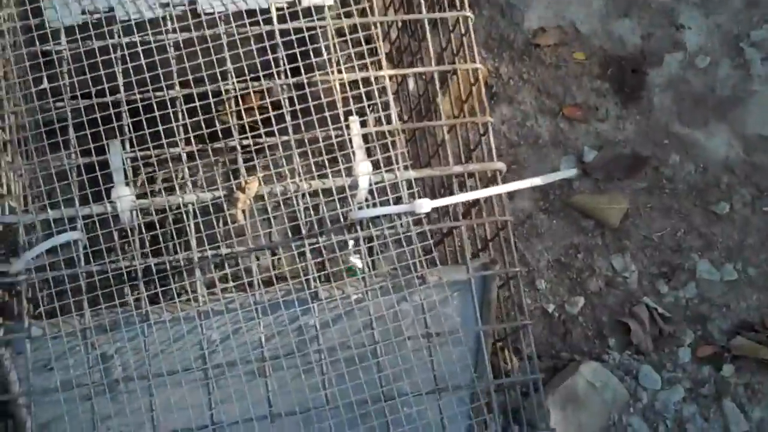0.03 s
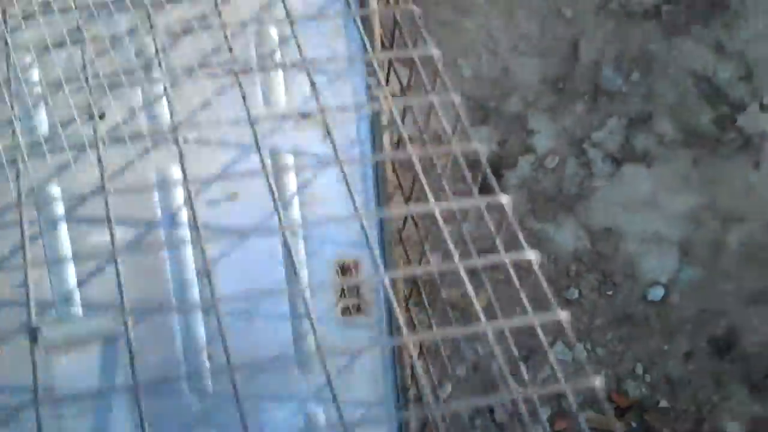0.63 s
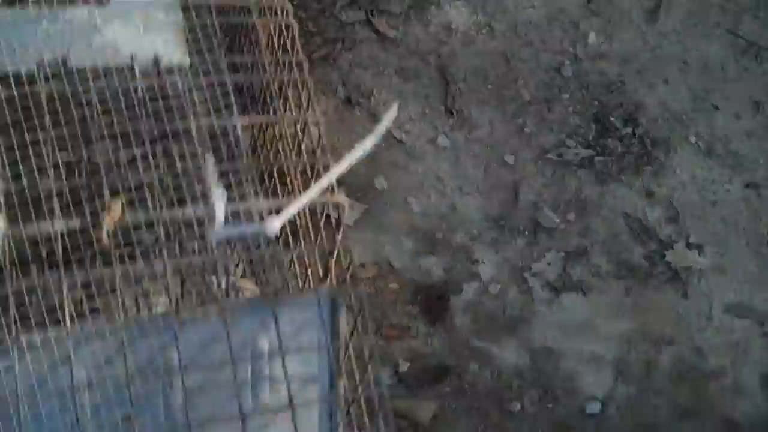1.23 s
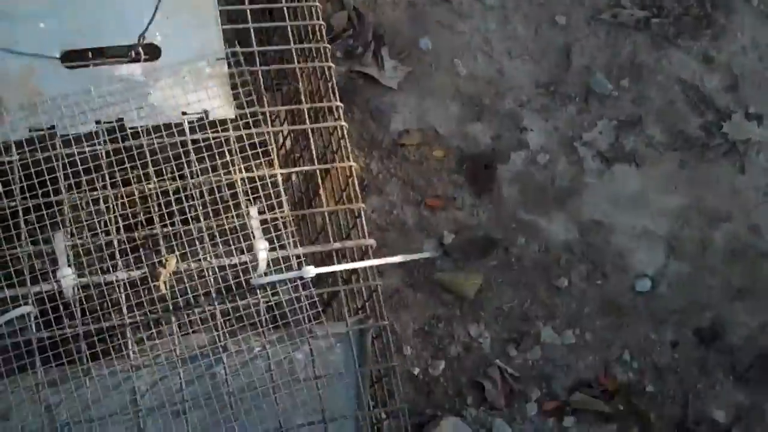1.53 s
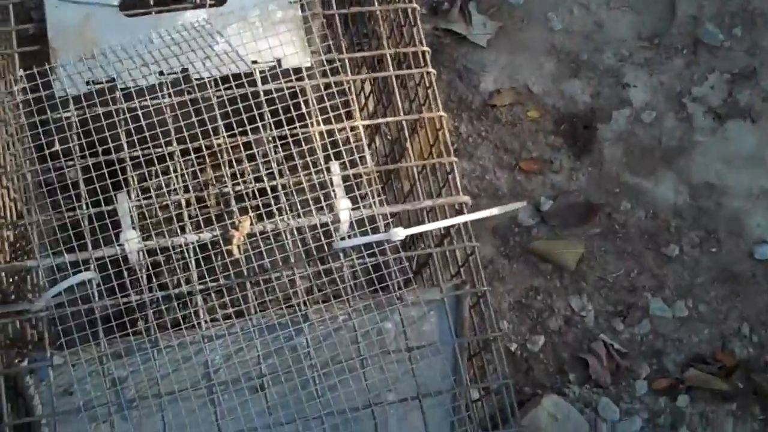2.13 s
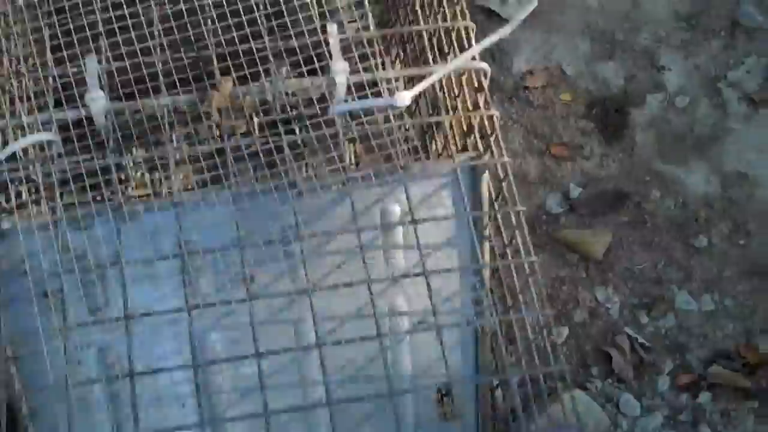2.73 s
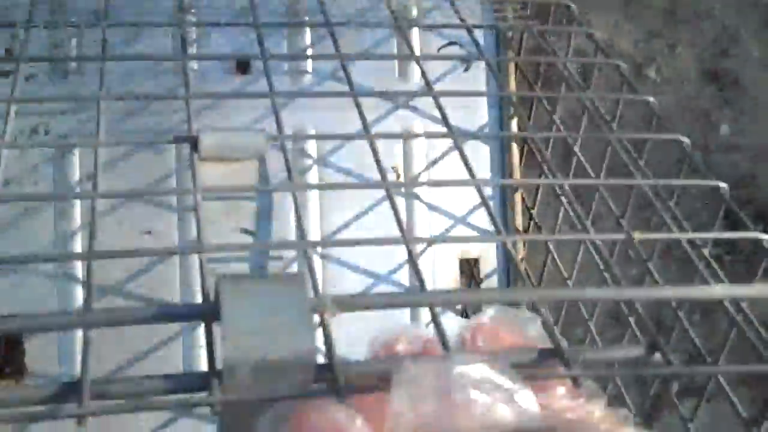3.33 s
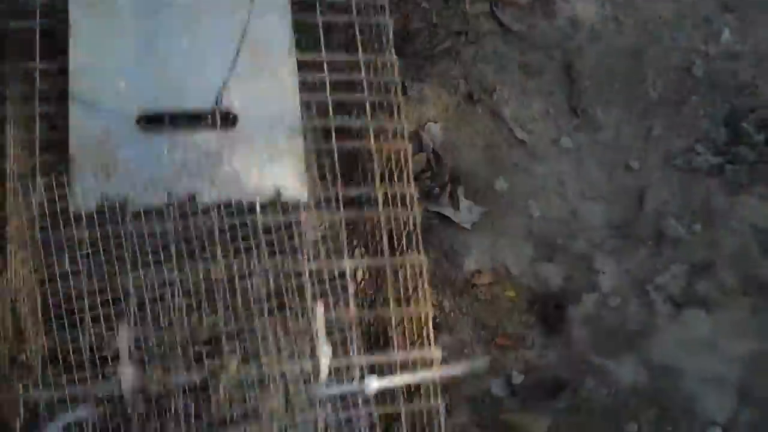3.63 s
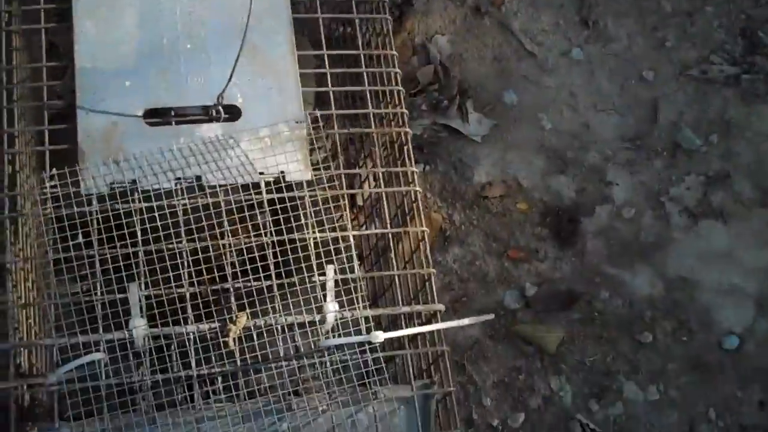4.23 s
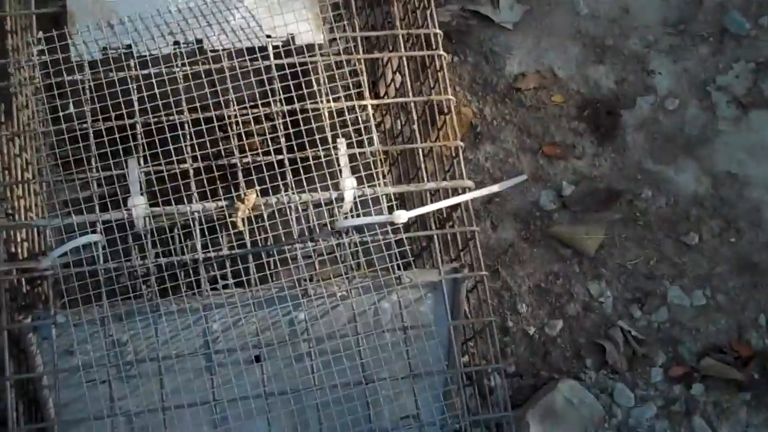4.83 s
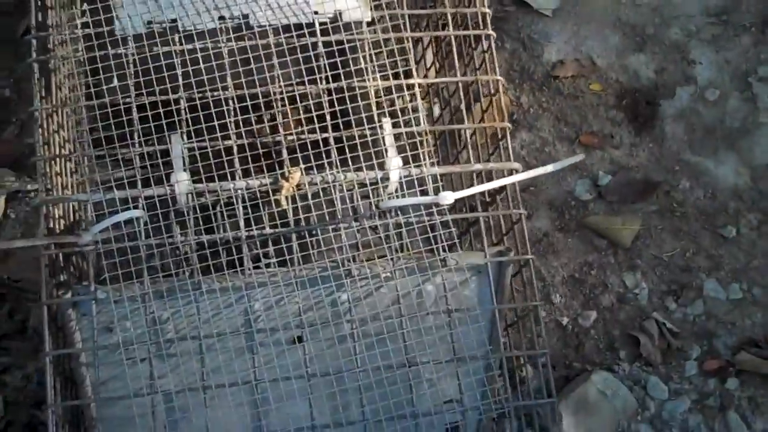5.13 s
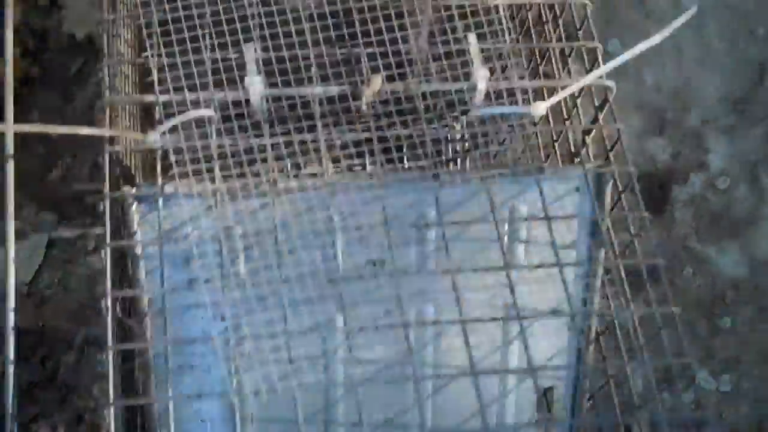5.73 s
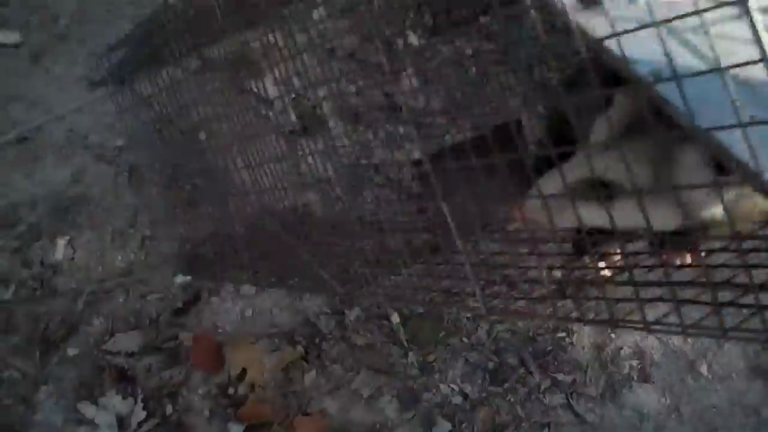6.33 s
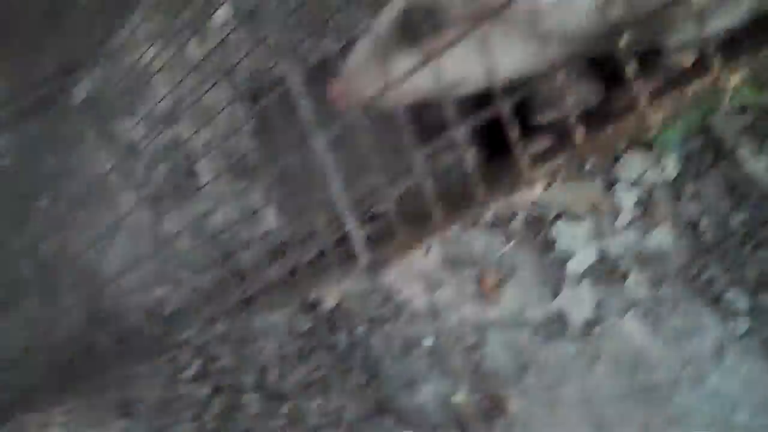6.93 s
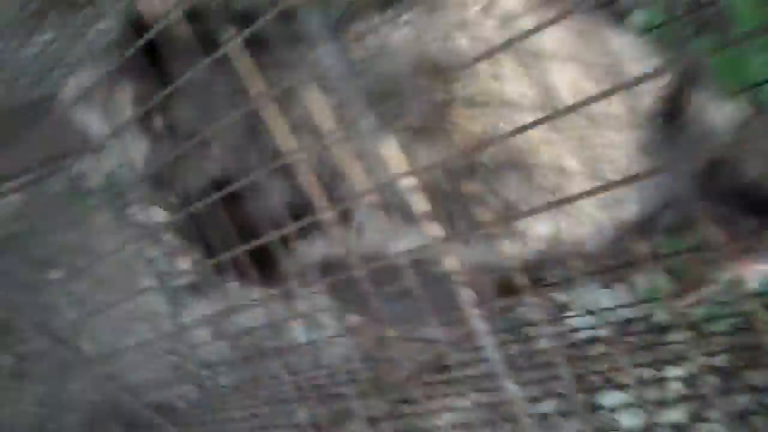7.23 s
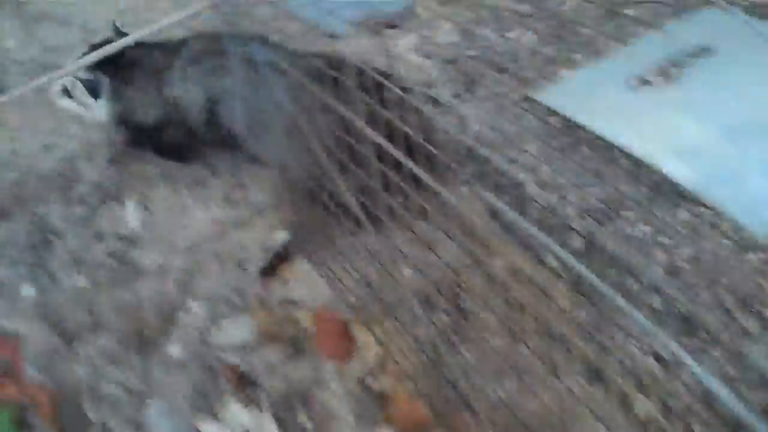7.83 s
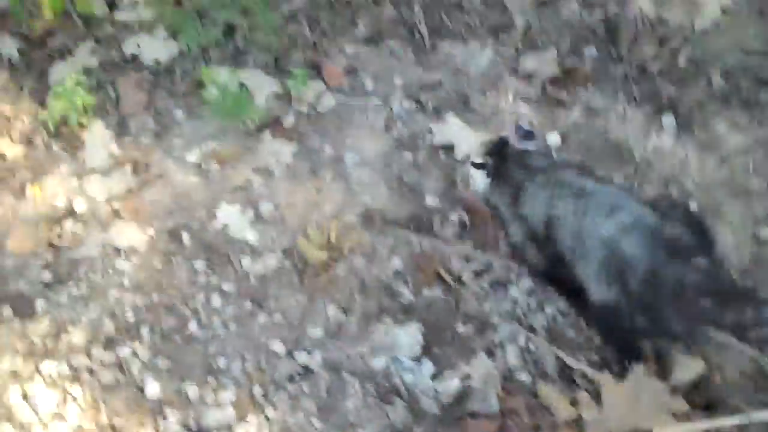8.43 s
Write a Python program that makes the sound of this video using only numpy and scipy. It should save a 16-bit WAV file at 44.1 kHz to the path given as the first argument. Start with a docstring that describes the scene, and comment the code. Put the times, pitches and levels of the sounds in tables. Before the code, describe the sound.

A wire trap's metal door slams twice with a ringing rattle amid leaf rustling, then an opossum scurries out over dry leaves.

```python
"""Sleeves and dry leaves rustle close by, twigs snap, and a far machine throbs faintly.
The sheet-metal door of a wire live trap slams twice: it rebounds, the mesh rattles and rings,
and the cage thumps the soil. Then the animal inside scurries out over the leaves.
Only the right microphone works; the slams overload it and push its gain down."""
import sys
import numpy as np
from scipy import signal
from scipy.fft import rfft, irfft
from scipy.io import wavfile

SR = 44100
rng = np.random.default_rng(int(sys.argv[2]) if len(sys.argv) > 2 else 0)


def generate_wav(sig):
    """Save sig (samples, or channels by samples) to the path in sys.argv[1] as 16-bit PCM at SR."""
    pcm = np.round(np.clip(np.atleast_2d(sig).T, -1, 1) * 32767).astype(np.int16)
    wavfile.write(sys.argv[1], SR, pcm)


N = 373968
TIME = np.arange(N) / SR

# Four spells of handling, a fader curve each. Each row: time in seconds, level in dB.
HANDLING = [
    [(0.0, -41), (0.058, -34), (0.082, -43.5), (0.134, -36.5), (1.028, -38), (1.218, -27), (1.23, -35.5),
     (1.336, -41), (1.344, -50.5), (1.42, -44)],
    [(1.98, -58.5), (2.184, -53.5), (2.362, -42), (3.322, -39), (3.352, -48.5), (3.514, -32.5),
     (3.524, -35.5), (3.562, -27.5), (3.73, -47.5), (3.74, -37.5)],
    [(4.45, -53), (4.542, -61), (4.564, -44.5), (4.578, -55), (4.858, -49.5), (4.922, -39), (5.18, -37.5),
     (5.272, -46.5), (5.326, -38.5), (5.41, -44.5)],
    [(5.46, -33.5), (5.508, -43.5), (6.14, -29), (6.158, -38.5), (6.524, -41), (6.568, -34.5),
     (6.796, -41.5), (6.854, -37.5), (7.006, -38.5), (7.06, -36.5)],
]
# The animal's run through the leaves. Each row: time in seconds, level in dB.
ESCAPE = [(7.06, -41), (7.28, -24), (7.412, -29), (7.918, -34), (8.294, -33), (8.48, -35.5)]
# Single sweeps through the leaves. Each row: peak time in seconds, level in dB, swell in seconds.
SWISHES = [(.18, -43, 0.034), (.47, -37, 0.051), (.7, -34.5, 0.013), (2.57, -39.5, 0.038),
           (3.79, -32, 0.022), (5.63, -33, 0.015), (6.69, -37, 0.028), (7.09, -30, 0.021),
           (7.29, -33, 0.042), (7.432, -27, 0.033), (7.55, -30, 0.15), (7.84, -34.5, 0.069),
           (8.16, -27.5, .04)]
# EQ of the dry leaves. Each row: frequency in Hz, relative level in dB.
RUSTLE_EQ = [(150, -66), (250, -22), (488, -26.5), (540, -20.5), (774, -18), (2200, -9.5), (2570, -10.5),
             (3620, -9), (4760, -7), (5850, 1), (6480, -2.5), (7820, -13), (13100, -28), (14200, -35),
             (15000, -87)]
# Weight of the crunch in dB, for each spell of handling and then for the run.
CRUNCH_DB = [-7.5, -8.5, -12.5, -7.5, -2.5]
# The far machine. Each row: time in seconds, throb level in dB, whine level in dB.
MACHINE = [(0, -78, -73.5), (1.1, -68.5, -56.5), (2.2, -68, -66.5), (3.0, -80, -72), (4.7, -74, -74),
           (6.0, -69, -63.5), (6.7, -60.5, -58.5), (8.48, -71, -63)]
# EQ of the outdoor air. Each row: frequency in Hz, relative level in dB.
AIR_EQ = [(15, -28), (25, -8.5), (202, 2), (344, -19), (584, 0), (761, -1), (916, 2), (2640, -15.5),
          (6000, 2), (8240, -56), (14000, -34)]
# The loudest twigs and leaves breaking, and at 6.464 s a bright tick of a cage wire. Each row: start in
# seconds, level in dB, 60 dB decay in seconds.
SNAPS = [(.051, -32, 0.067), (.243, -22.5, 0.024), (.259, -24, 0.057), (0.854, -23, 0.04),
         (.933, -35, 0.013), (0.958, -27, 0.01), (1.212, -14.5, 0.034), (2.671, -25, .009),
         (3.108, -23, 0.0058), (3.416, -23.5, 0.034), (3.446, -33, 0.023), (3.506, -13.5, 0.032),
         (5.129, -32, .03), (5.235, -38, .04), (5.43, -18, .09), (5.777, -23, 0.16), (6.132, -24, 0.015),
         (6.464, -16, 0.013), (6.502, -30, 0.035), (6.557, -19.5, 0.077), (6.605, -20, .07),
         (6.822, -29, .015), (6.844, -24.5, 0.048), (7.07, -23.5, 0.36), (7.296, -16, 0.1),
         (7.613, -16.5, 0.054), (8.162, -12, 0.037)]
# EQ of a snap. Each row: frequency in Hz, relative level in dB.
SNAP_EQ = [(290, -59), (500, -23), (1680, -17), (3830, -11.5), (5310, -2), (6210, 0), (8250, -15),
           (13400, -31), (14400, -49), (15000, -43)]
# Paws and shoes. Each row: start in seconds, level in dB, decay in seconds, centre pitch in Hz.
STEPS = [(.605, -24.5, 0.02, 2340), (.989, -31.5, 0.019, 1700), (6.226, -28.5, 0.1, 1490),
         (6.227, -24.5, 0.073, 3280), (6.69, -33, 0.033, 600), (7.255, -28, 0.094, 1120),
         (7.272, -24.5, 0.041, 368), (7.735, -45, 0.62, 304), (7.984, -37.5, 0.19, 380),
         (8.135, -37, 0.31, 415), (8.16, -30, 0.086, 705), (8.22, -32, .16, 775), (8.255, -29.5, 0.14, 750)]
# EQ of soil under the paws. Each row: frequency in Hz, relative level in dB.
SCUFFLE_EQ = [(60, -3.5), (150, -1), (300, 3), (500, 4), (900, 5), (2000, -63)]
# Door slams. Each row: start in seconds, level in dB, rebound gap in seconds,
# shake length in seconds, trim of the frame's rattle in dB.
SLAMS = [(1.446, -1, 0.0613, 0.25, -22), (3.805, -1, 0.079, 0.43, -10)]
# Lighter blows on the cage. Each row: start in seconds, level in dB, chatter decay in seconds.
BLOWS = [(1.829, -32.5, 0.32), (3.765, -30, 0.26), (4.09, -25, 0.34), (4.318, -23, 0.061),
         (4.353, -25, 0.16), (4.405, -36, 0.21), (7.729, -15.5, 0.34)]
# EQ of the struck cage. Each row: frequency in Hz, relative level in dB.
CAGE_EQ = [(88, -30), (150, -13.5), (409, -14.5), (661, -10), (772, -13.5), (1090, -9), (1570, -7.5),
           (2400, -8), (2920, -10.5), (4210, -6.5), (6300, 0.5), (8920, -18.5), (13400, -29.5),
           (14200, -70), (15000, -105)]
# Narrow ringing tones that colour the slams. Each row: pitch in Hz, relative level in dB,
# decay in seconds.
SLAM_TONES = [(356.6, 12.5, 0.3), (587, 6, 0.72), (627, 13, 0.4), (930, 2.5, 1), (1424, 1, 0.95),
              (1490, 3, 0.5), (1760, 6.5, 0.84), (2210, 5, 0.77), (2480, 1, 0.65), (2540, 9, 0.25),
              (2567, 15, 0.23), (2764, 13, 0.35), (3165, 12, 0.53), (3469, 2, 0.39), (3700, -12, 0.74),
              (4297, -27, 0.18), (4538, -3, 0.37)]
# The cage's weight landing on the soil. Each row: start in seconds, level in dB.
THUMPS = [(1.46, -13.5), (1.507, -21.5), (3.819, -9.5)]
# EQ of that thud. Each row: frequency in Hz, relative level in dB.
THUMP_EQ = [(20, -5), (40, 1), (65, -1.5), (100, -2), (150, -4), (200, -1), (280, -4.5), (380, -13.5),
            (580, -8), (1000, -22)]
# Boom of the sheet-metal floor. Each row: pitch in Hz, relative level in dB, decay in seconds.
FLOOR_MODES = [(89, -4, .1), (258, 3, 0.12)]
# Single wires twanging. Each row: start in seconds, level in dB, decay in seconds, pitch in Hz.
TWANGS = [(1.74, -43, .5, 2510), (2.22, -58, 0.28, 1270), (3.13, -49.5, 0.28, 960), (4.09, -42, 0.47, 3165),
          (4.357, -55, .3, 1460), (4.44, -62, .9, 930)]
# A finger on the microphone housing. Each row: start in seconds, level in dB, decay in seconds,
# centre pitch in Hz.
BUMP = [(8.052, -34, 0.039, 75)]
# EQ of the preamp hiss. Each row: frequency in Hz, relative level in dB.
HISS_EQ = [(20, 8.5), (60, 0), (300, 3.5), (1000, 0.5), (3000, -4.5), (7000, -9.5), (14000, -14)]


def from_db(db):
    """Decibels to gain."""
    return 10 ** (np.asarray(db) / 20)


def rms_one(x):
    """Scale to unit rms."""
    return x / np.sqrt(np.mean(x ** 2) + 1e-20)


def noise():
    """White noise."""
    return rng.standard_normal(N)


def drift(per_s):
    """Random wander of spread 1."""
    knots = rng.standard_normal(N // 20)
    return np.interp(TIME * per_s, np.arange(len(knots)), knots) * np.sqrt(3 / 2)


def butter(x, hz, kind, order=2):
    """Butterworth filter."""
    return signal.sosfilt(signal.butter(order, np.clip(hz, 10, .45 * SR), kind, fs=SR, output="sos"), x)


def convolve(x, response):
    """Pass a sound through a response of unit energy."""
    return signal.oaconvolve(x, response / np.linalg.norm(response))[:N]


def eq(x, spectrum, size=4096):
    """Minimum-phase EQ: shapes the tone with no ringing ahead of an attack."""
    hz, db = np.transpose(spectrum)
    grid = np.maximum(np.arange(size // 2 + 1) * SR / size, 1)
    gains = from_db(np.interp(np.log(grid), np.log(hz), db))
    cepstrum = irfft(np.log(gains))
    return convolve(x, irfft(np.exp(rfft(2 * cepstrum[:size // 2], size))))


def grains(per_s, spread_db):
    """Random tiny contacts of uneven size, rms 1."""
    sizes = from_db(spread_db * np.minimum(rng.exponential(1, N), 5))
    return rms_one((rng.random(N) < per_s / SR) * sizes * rng.choice([-1, 1], N))


def bursts(rows, rise_s):
    """Envelope of hits that swell quickly and die away; their powers add."""
    power = np.zeros(N)
    for s, db, t60 in rows:
        age = TIME[:int(t60 * SR)]
        at = int(s * SR)
        shape = from_db(db - 60 * age / t60) * (1 - np.exp(-age / rise_s))
        power[at:at + len(age)] += shape[:N - at] ** 2
    return np.sqrt(power)


def knocks(rows, width, rise_s):
    """Noise bursts, each in its own band; width is a share of the centre pitch."""
    out = np.zeros(N)
    for s, db, t60, hz in rows:
        body = rms_one(butter(noise(), [hz / (1 + width), hz * (1 + width)], "band"))
        out += bursts([(s, db, t60)], rise_s) * body
    return out


def ringing(tones):
    """One second of ring: a sum of decaying sines."""
    age = TIME[:SR]
    return sum(from_db(db - 60 * age / t60) * np.sin(2 * np.pi * (hz * age + rng.random()))
               for hz, db, t60 in tones)


def spell(rows, fade_db_per_s=400):
    """Fader for a spell of movement, closing quickly at either end."""
    times, db = np.transpose(rows)
    outside_s = np.abs(TIME - np.clip(TIME, times[0], times[-1]))
    return from_db(np.interp(TIME, times, db) - np.minimum(fade_db_per_s * outside_s, 100))


def movement(release_s=0.038):
    """Effort that drives the leaves: handling, the animal's run and single sweeps add in power."""
    power = sum(spell(rows) ** 2 for rows in HANDLING) + (from_db(-0.97) * spell(ESCAPE)) ** 2
    for s, db, swell_s in SWISHES:
        from_peak = np.maximum((s - TIME) / swell_s, (TIME - s) / release_s)
        power += from_db(db) ** 2 * np.exp(-np.minimum(from_peak ** 2, 50))
    return np.sqrt(power)


def leaf_ticks(per_s, q, count=24):
    """Every dry leaf ticks at a pitch of its own."""
    pitches = np.geomspace(1500, 9000, count) * np.exp(0.041 * rng.standard_normal(count))
    ticks = 0
    for hz in pitches:
        b, a = signal.iirpeak(hz, q, fs=SR)
        ticks += signal.lfilter(b, a, grains(per_s, spread_db=3) + 1e-18)
    return rms_one(ticks)


def crunch_gain(effort, pivot_db=-36, follows=0.74):
    """The crunch takes a share of the effort's swing and weighs most once the animal runs."""
    starts = [rows[0][0] for rows in list(HANDLING[1:]) + [ESCAPE]]
    weight_db = np.array(CRUNCH_DB)[np.searchsorted(starts, TIME)]
    return from_db(pivot_db + weight_db) * (effort / from_db(pivot_db)) ** follows


def rustle(effort, bands=10):
    """Leaves crackle and tick over soft friction: a crisp top and a coarse crunch below."""
    crackle = grains(per_s=2800, spread_db=4) + from_db(-1.5) * noise()
    clumps = from_db(1.28 * drift(35) + 1.16 * drift(260))
    contacts = clumps * (crackle + from_db(-6.5) * leaf_ticks(per_s=50, q=70))
    spectrum = rfft(eq(contacts, RUSTLE_EQ))
    # pieces of different size come and go, so each band swells on its own
    hz = np.arange(N // 2 + 1) * SR / N
    band_of = np.searchsorted(np.geomspace(900, 9000, bands - 1), hz)
    leaves = sum(irfft(spectrum * (band_of == k), N) * from_db(1.37 * drift(40)) for k in range(bands))
    crisp = rms_one(butter(leaves, 1895, "high", order=3))
    crunch = rms_one(butter(leaves, 2324, "low", order=3))
    return from_db(1.11) * effort * crisp + from_db(-4) * crunch_gain(effort) * crunch


def machine(hum_hz=198, beats_per_s=15, whine_hz=(546, 600)):
    """Two close hums beat against each other under a pair of wavering whines."""
    times, *levels = np.transpose(MACHINE)
    throb_gain, whine_gain = (from_db(np.interp(TIME, times, db)) for db in levels)
    phase = 2 * np.pi * np.cumsum(hum_hz + 3 * drift(18)) / SR
    beat = 2 * np.pi * np.cumsum(beats_per_s + 0.31 * drift(3.7)) / SR
    throb = (np.sin(phase) + 0.95 * np.sin(phase + beat)) * from_db(1.25 * drift(16))
    whines = sum(butter(noise(), [hz - 11, hz + 11], "band", order=1) for hz in whine_hz)
    return throb_gain * throb + whine_gain * rms_one(whines)


def air():
    """A faint, steady bed of outdoor noise."""
    return from_db(-57.5) * eq(noise(), AIR_EQ)


def snaps(effort, small_per_s=18):
    """Twigs and leaves break in runs of tiny fractures; the big ones open with a sharp crack."""
    moments = rng.uniform(0, N - 1, int(small_per_s * N / SR)).astype(int)
    small = effort * bursts([(at / SR, 0.5, 0.015) for at in moments], rise_s=0.0005)
    fractures = (bursts(SNAPS, rise_s=0.0039) + small) * grains(per_s=13000, spread_db=2)
    for s, db, t60 in SNAPS:
        crack_db = 17 - np.log2(t60 / 0.0078)  # quick snaps crack hardest, slow crushes least
        fractures[int(s * SR)] += from_db(db + crack_db)
    return eq(fractures, SNAP_EQ)


def steps():
    """Paws and shoes land with damped knocks; a low scuffle of soil joins as the animal bolts."""
    running = spell([(ESCAPE[0][0], -54.5), (ESCAPE[-1][0], -54)])
    scuffle = running * eq(grains(per_s=1000, spread_db=4.5), SCUFFLE_EQ)
    return scuffle + knocks(STEPS, width=0.78, rise_s=0.0019)


def door_hits(rebound_loss_db=14.5):
    """The door scrapes its guides, lands, jangles and rebounds twice; rows read like BLOWS."""
    hits = []
    for s, db, gap_s, _, _ in SLAMS:
        scrape = (s - 0.0065, db - 23, 0.084)
        landing = (s, db, 0.1)
        jangle = (s, db - 11.5, 0.44)
        rebounds = [(s + k * gap_s, db - k * rebound_loss_db, 0.16) for k in (1, 2)]
        hits += [scrape, landing, jangle] + rebounds
    return hits


def cage_shake(attack_s=0.045, sag_db_per_s=12.5, stop_db_per_s=124):
    """After a slam the cage shakes on, then comes to rest: envelopes for mesh and frame."""
    mesh, frame = 0, 0
    for s, _, _, shake_s, frame_db in SLAMS:
        age = np.maximum(TIME - s, 0)
        loss_db = sag_db_per_s * age + stop_db_per_s * np.maximum(age - shake_s, 0)
        shake = np.minimum(age / attack_s, 1) * from_db(-23 - loss_db)
        mesh += shake
        frame += from_db(frame_db) * shake
    return mesh, frame


def cage(wire_decay_s=0.15, rattle_hz=(280, 3400)):
    """Each blow makes the wires chatter and the mesh ring; narrow ringing tones add colour."""
    force = bursts(door_hits() + list(BLOWS), rise_s=0.001)
    chatter = force * grains(per_s=7000, spread_db=-0.5)
    mesh_gain, frame_gain = cage_shake()
    shaking = mesh_gain * grains(per_s=5200, spread_db=0.5) * from_db(2 * drift(70))
    contacts = chatter + shaking
    wires = ringing([(hz, 0, wire_decay_s) for hz in rng.uniform(700, 8000, size=400)])
    tones = ringing(SLAM_TONES)
    ring = from_db(-14) * convolve(contacts, wires) + from_db(-18) * convolve(contacts, tones)
    # the frame rattles dully against the mesh
    clatter = convolve(grains(per_s=350, spread_db=0.5), wires)
    clatter += from_db(-19) * grains(per_s=900, spread_db=6)
    rattle = frame_gain * rms_one(butter(clatter, rattle_hz, "band"))
    return eq(contacts + ring, CAGE_EQ) + rattle


def thumps(thud_s=0.067, settle_s=1):
    """The whole trap jolts against the ground, its floor booms and it settles."""
    jolts = [(s, db, thud_s) for s, db in THUMPS]
    settling = [(s, db - 41, settle_s) for s, db in THUMPS]
    thuds = eq(bursts(jolts + settling, rise_s=0.00044) * noise(), THUMP_EQ)
    floor_hits = np.zeros(N)
    for s, db in THUMPS:
        floor_hits[int(s * SR)] = from_db(db + 7.5)
    return thuds + convolve(floor_hits, ringing(FLOOR_MODES))


def twangs():
    """Single wires sing out in narrow bands with a fluttering level."""
    return knocks(TWANGS, width=0.025, rise_s=0.006) * from_db(6 + 4.5 * drift(60))


def finger_bump():
    """A finger knocks the microphone housing: one soft, low bump."""
    return knocks(BUMP, width=1, rise_s=0.0027)


def scene(crosstalk_db=-68):
    """Airborne sound sits hard right with a trace on the left; the bump shakes both channels."""
    effort = movement()
    mix = 2 * (air() + rustle(effort) + snaps(effort) + cage() + thumps() + twangs() + steps()
               + machine())
    return np.array([from_db(crosstalk_db) * mix, mix]) + finger_bump()


def auto_gain(x, threshold_db, fall_db_per_s, rise_db_per_s):
    """The gain ducks steadily while the right channel is loud and climbs back afterwards."""
    power = butter(x[1] ** 2, 10, "low", order=1)
    level_db = 10 * np.log10(np.abs(power) + 1e-12)
    loud = 0.5 + 0.5 * np.tanh((level_db - threshold_db) / 2)
    travel_db = np.cumsum(loud * fall_db_per_s - (1 - loud) * rise_db_per_s) / SR
    return x * from_db(np.minimum.accumulate(travel_db) - travel_db)  # never above unity


def record(dry, top_cut_hz=14150):
    """Preamp hiss, automatic gain, hard overload and a steep top cut."""
    hiss = from_db(-58) * np.array([eq(noise(), HISS_EQ) for side in dry])
    levelled = auto_gain(dry + hiss, threshold_db=-18, fall_db_per_s=62, rise_db_per_s=34)
    overloaded = np.clip(levelled, -0.8, 0.8)
    return signal.sosfilt(signal.ellip(12, 0.1, 100, top_cut_hz, fs=SR, output="sos"), overloaded)


dry = scene()
out = record(dry)
generate_wav(out)
```